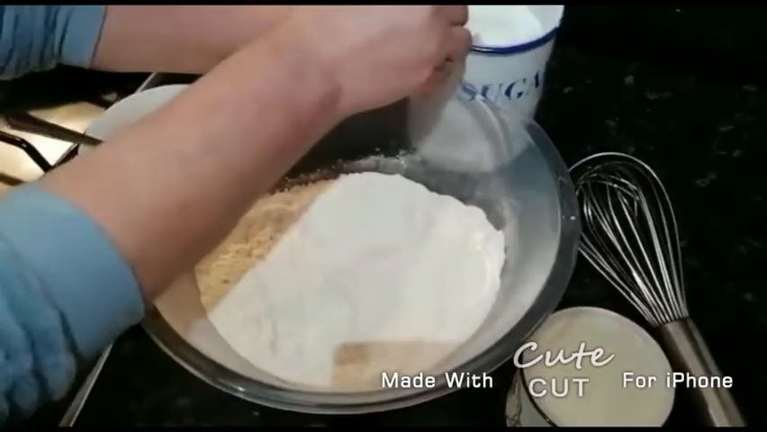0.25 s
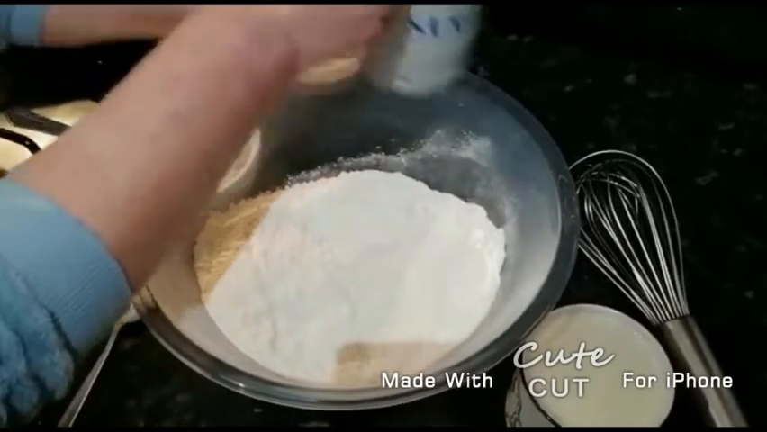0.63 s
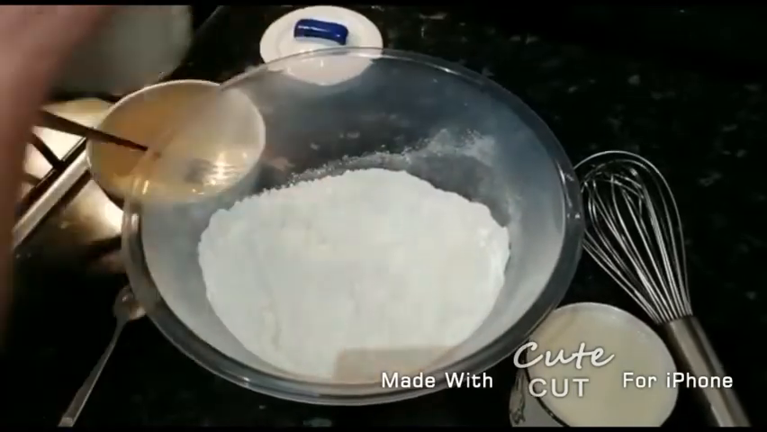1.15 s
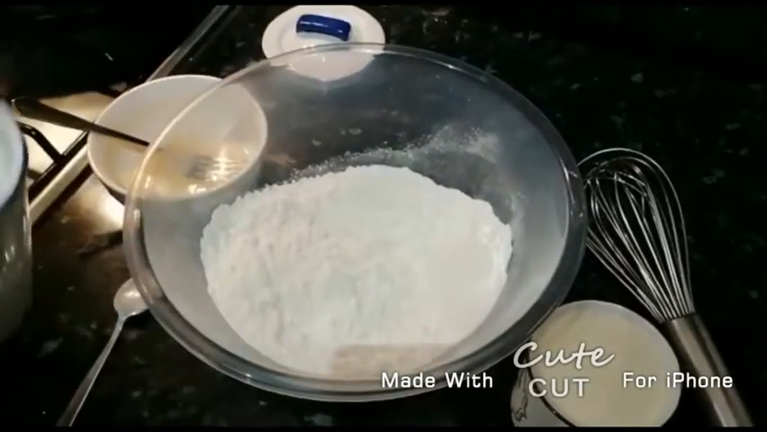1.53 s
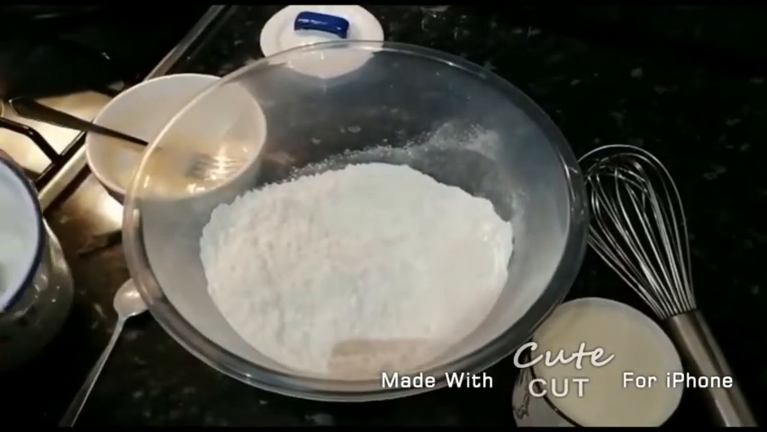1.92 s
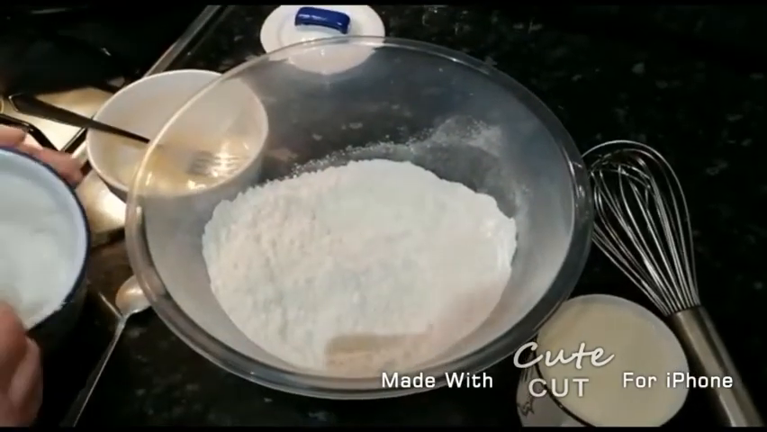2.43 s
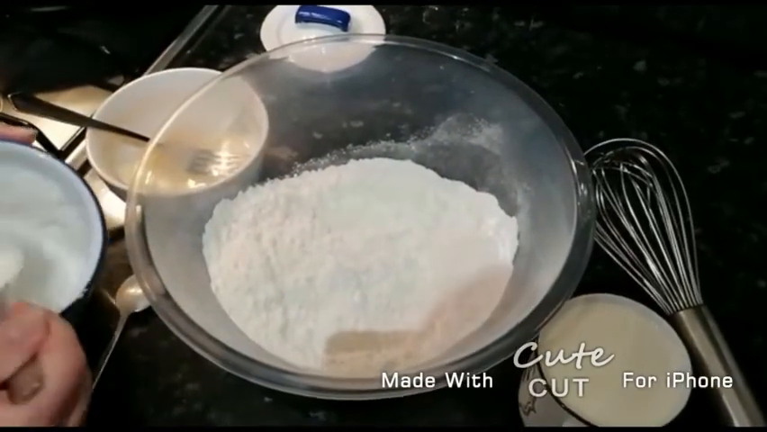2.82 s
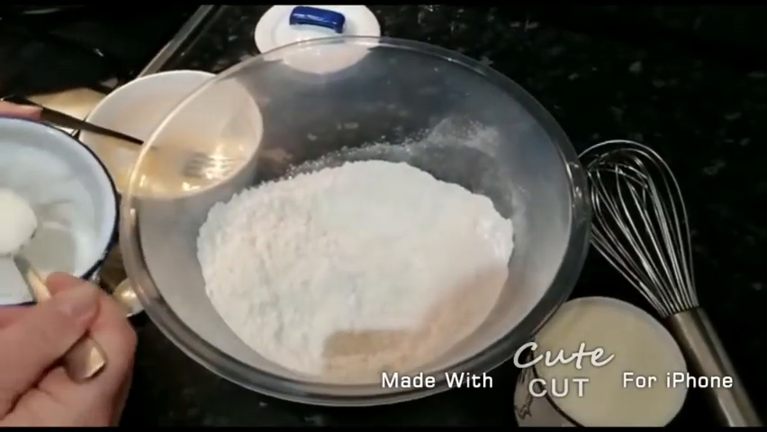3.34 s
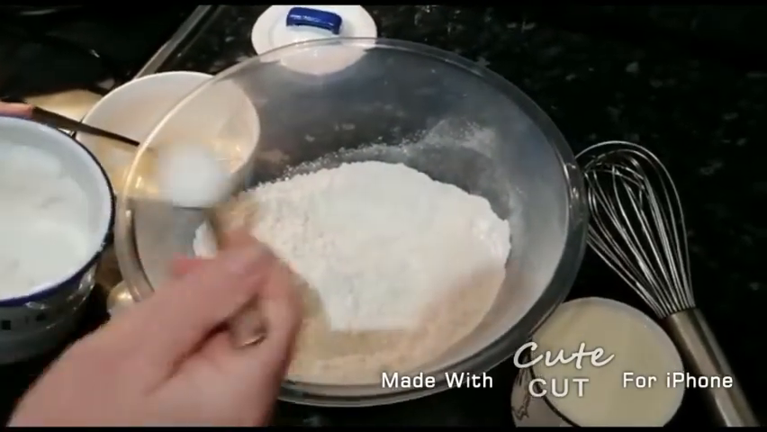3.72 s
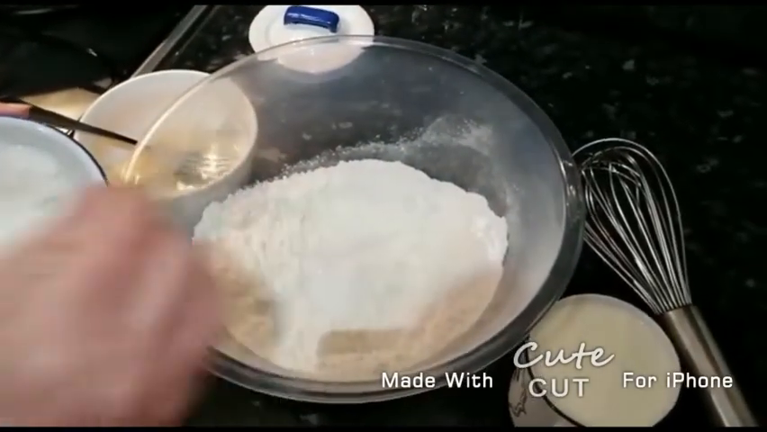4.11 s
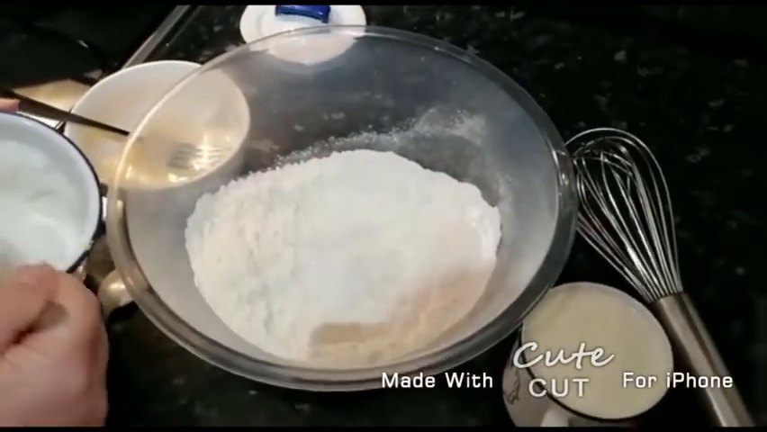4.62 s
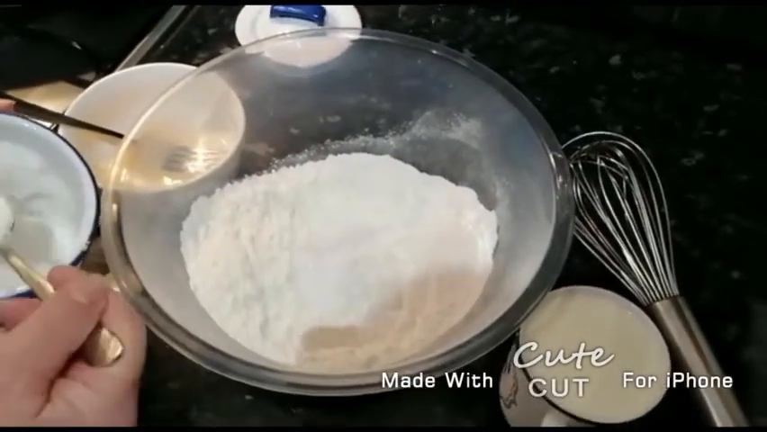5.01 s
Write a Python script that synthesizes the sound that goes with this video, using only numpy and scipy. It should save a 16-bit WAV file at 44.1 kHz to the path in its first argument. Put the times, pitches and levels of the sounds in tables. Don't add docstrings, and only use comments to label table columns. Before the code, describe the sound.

Sparse handling sounds over soft room rumble: a light tap, a brighter spoon-on-jar clink and gritty scrape, near silence, then one dominant hard set-down on the counter with rattling cutlery. A gentler, duller set-down follows a second later. Later the spoon faintly ticks and scrapes in sugar, grains sliding softly. Close phone microphone, lively hard kitchen.

```python
import sys
import numpy as np
from scipy import signal
from scipy.fft import rfft, irfft, next_fast_len
from scipy.io import wavfile
from scipy.ndimage import map_coordinates

SR = 44100
rng = np.random.default_rng(int(sys.argv[2]) if len(sys.argv) > 2 else 0)


def boost(x):
    u = np.asarray(x, float) / 20
    return 10 ** u


def master(y):
    cut = np.clip(np.atleast_2d(y).T, -1, 1)
    pcm = np.round(cut * 32767)
    wavfile.write(sys.argv[1], SR, pcm.astype(np.int16))


N = 231569

# start_s, peak_db, contact_softness_s, cutlery_ring_db, cutlery_delay_s
JAR_LANDINGS = [
    (1.8739, 1, 0.00023, -20.5, .011),
    (2.8673, -8, 0.00035, -36.5, 0.0098),
]
# pitch_hz, level_db, t60_s
SLAB_MODES = [(67.4, -7, 0.54), (169, -3, 0.25), (211.3, 0, 0.26), (274, -25, 0.34), (282.8, 4.5, 0.52),
              (326.5, -1.5, .3), (369.5, -3, 0.083), (457, -6, 0.59), (590, 7, 0.36), (815, -16.5, 0.067),
              (1006, -13.5, 0.78)]
SPOT_DRIVE = [
    [0, 0, 0, 0, 0, 0, 0, 0, 0, 0],
    [1.5, 1.4, -1.5, 1.8, -6, -10, -2, -18, -3, -16],
]
# pitch_hz, level_db (per Hz)
SLAP_SPECTRA = [
    [(35, -66), (60, -9), (298, -0.5), (480, -7), (655, -8.5), (837, -18.5), (1070, -13), (1240, -12),
     (3000, -15.5), (3900, -64.5), (6600, -120)],
    [(60, -33), (170, 0), (280, -3.5), (450, -11.5), (600, -30), (830, -22), (1200, -23), (3000, -64),
     (6000, -80)],
]
CUTLERY_PITCHES = [1768, 2686, 4312, 4378, 4600, 5230, 6202, 7736, 8480, 8866, 10280, 11705, 13170, 14420]
# level_db, t60_s
CUTLERY_RINGS = [
    [(-22.5, 0.47), (-17, 0.107), (-5.5, 0.37), (-4, 0.28), (-7.5, 0.055), (-17, .3), (-18, 0.18),
     (-9.5, 0.23), (-25, 0.097), (-23, 0.12), (-26, 0.47), (-25.5, .22), (-27, 0.29), (-23.5, .1)],
    [(6.5, 0.094), (-6.5, 0.16), (-13, 0.3), (-12, 0.27), (10.5, 0.026), (-21, .3), (-28, 0.19),
     (2.5, 0.12), (-26, 0.18), (-24, .09), (-12, 0.093), (-13, 0.18), (-26, 0.145), (-24, .08)],
]
# level_db, delay_s
DISH_RATTLES = [
    (-31.5, 0),
    (-47.5, 0.0021),
]
# pitch_hz, level_db (per Hz)
DISH_SPECTRUM = [(900, -28.5), (1700, 4.5), (2600, -2.5), (4400, -6.5), (8000, -12.5), (12500, -17.5),
                 (14500, -27.5)]
# start_s, length_s, level_db
TREMBLES = [
    (1.888, 0.17, -53),
    (2.877, 0.13, -61),
]
# pitch_hz, width_hz, level_db
TREMBLE_PEAKS = [
    [(4380, 29, 0.5), (5210, 51, -20.5), (6000, 52, -24), (7730, 37, -15), (8490, 26, -24),
     (10700, 58, -26.5), (11400, 50, -28)],
    [(1760, 74, 1), (2530, 52, 4.5), (4430, 120, 0), (5230, 27, -8), (7750, 33, 0.5), (8170, 36, -14),
     (8400, 83, -22)],
]

# start_s, peak_db, steel_db, knock_db, click_centre_hz
SPOON_CLINKS = [
    (0.0034, -49.5, -22, 3, 2130),
    (0.049, -24.5, -13.5, -3, 2140),
    (0.7534, -10, -10, -33, 2390),
    (1.0229, -40, -52, -7.5, 1860),
    (2.33, -33, -26, -17.5, 3500),
    (2.355, -42, -35, 2.5, 2000),
    (4.1835, -28, -6.5, -4, 1830),
    (4.3901, -36, -19, -6.5, 2070),
    (4.644, -56, -30, 8.5, 1980),
]
# pitch_hz, level_db, t60_s
JAR_MODES = [(2063, -3.5, 0.095), (2250, -19, 0.08), (2700, -19.5, 0.041), (3400, -24, 0.05),
             (4050, 7, 0.052), (4820, 10, 0.036), (5740, -3.5, 0.045), (5770, -10, 0.16), (6223, -9, 0.095),
             (7300, -34, .04)]
# pitch_hz, level_db, t60_s
RIM_MODES = [(1295, 2, 0.068), (1374, 7.5, 0.018)]
# pitch_hz, level_db, t60_s
SPOON_MODES = [(9250, -9, .04), (9300, 5, 0.048), (11400, -3, 0.047), (13270, -42, .04), (14800, -46, .08)]
# pitch_hz, level_db (per Hz)
SUGAR_SPECTRUM = [(2500, -16.5), (4500, 1), (6500, -2.5), (8300, -7), (9500, -6.5), (11500, -9),
                  (13200, -31), (14000, -39.5), (14900, -17), (15500, -4)]

# start_s, level_db, centre_hz, width_hz
DRY_TICKS = [(2.432, -68, 6500, 3000), (3.898, -60, 6270, 9100), (3.977, -74, 9000, 4000),
             (4.005, -64, 8050, 6000), (4.005, -52, 800, 1200), (4.083, -76, 11000, 5000),
             (4.129, -50, 1790, 4480), (4.389, -46, 3900, 1300)]
# start_s, level_db
RIM_SKIPS = [(0.823, -44.5), (.866, -41.5), (.89, -39.5), (0.907, -46), (1.024, -43.5), (4.645, -55.5)]
# start_s, level_db, pitch_hz, t60_s
GRAIN_PINGS = [(.053, -37.5, 282, 0.24), (.066, -47, 2300, 0.077), (0.753, -28, 1464, 0.072),
               (0.759, -48, 6223, 0.34), (.862, -55, 7470, 0.17), (1.023, -55, 4730, 0.064),
               (1.026, -51, 1870, 0.066), (2.328, -40, 3576, 0.067), (2.3285, -42, 3990, 0.06),
               (3.897, -58.5, 5780, 0.032), (3.905, -72.5, 5540, 0.18), (4.13, -57, 690, 0.089),
               (4.146, -58, 9300, 0.25), (4.147, -67, 11400, 0.12), (4.184, -43, 1435, 0.15),
               (4.184, -51, 2000, .05), (4.184, -51, 3960, 0.11), (4.391, -46.5, 2030, 0.097)]

# start_s, length_s, jar_drone_db, sugar_hiss_db
SCRAPE_STROKES = [(0.034, 0.25, -62, -76), (0.691, 0.039, -63.5, -62), (0.762, 0.075, -48, -56.5),
                  (0.85, 0.044, -53, -56), (0.916, 0.15, -66.5, -72), (1.025, 0.1, -61.5, -65.5),
                  (2.022, 0.096, -61.5, -60), (2.14, 0.21, -68, -68), (2.36, 0.06, -68, -89.5),
                  (2.953, 0.14, -70.5, -93), (4.146, 0.055, -62, -63), (4.181, .16, -57, -57.5),
                  (4.526, 0.081, -69.5, -74)]
# middle_s, half_length_s, jar_drone_db, sugar_hiss_db
HAND_SHIFTS = [(0.215, .04, -64, -71.5), (0.626, 0.083, -84, -84), (1.246, 0.14, -70, -86),
               (1.447, 0.11, -70.5, -79), (1.768, 0.26, -73.5, -81), (2.516, 0.083, -72.5, -80),
               (3.404, 0.1, -74, -92), (3.765, 0.053, -73.5, -75.5), (4.02, 0.15, -71.5, -99),
               (4.41, 0.071, -66.5, -86), (4.762, 0.087, -69, -81), (5.099, 0.07, -85, -93)]
# pitch_hz, width_hz, level_db
FRICTION_PEAKS = [(1390, 99, -4.5), (2280, 280, -7.5), (2767, 230, -5.5), (3960, 380, -8), (5100, 220, -17),
                  (6230, 90, -12.5), (7470, 110, -12)]
# start_s, length_s, level_db, centre_hz, width_hz
SUGAR_SLIDES = [(2.347, 0.019, -58, 3720, 1500), (2.48, .03, -76, 9870, 2500),
                (2.545, 0.025, -74, 9300, 600), (2.55, 0.023, -80, 11300, 2000),
                (4.009, 0.03, -61.5, 3860, 1300), (4.042, 0.19, -59, 2910, 700),
                (4.07, 0.069, -60.5, 1570, 250), (4.398, 0.067, -59, 1900, 600),
                (4.408, 0.087, -67, 3060, 700)]

# pitch_hz, level_db (per Hz)
AIR_SPECTRUM = [(12, -24), (20, -1), (42, -23), (70, -0.5), (103, -4.5), (175, -2), (259, -9.5),
                (306, -10.5), (427, -11), (465, -15.5), (597, -15.5), (985, -22), (1670, -26.5),
                (6720, -38.5), (15500, -71)]
# pitch_hz, width_hz, level_db
APPLIANCE_TONES = [
    (188.1, 17, -66),
    (438.8, 5.8, -72.5),
    (1192, 0.96, -79.5),
]
# time_s, level_db
RUMBLE_DRIFT = [(0, -55), (.6, -58), (1.6, -56), (2.7, -56.5), (3.6, -56), (4.0, -53.5), (4.7, -54.5),
                (5.25, -57.5)]
# start_s, level_db
RUMBLE_KNOCKS = [(.15, -57), (1.9, -39), (2.89, -59), (3.03, -53)]
# pitch_hz, t60_s
ROOM_DECAY = [(100, 0.75), (350, 0.38), (1000, 0.44), (2200, 0.54), (6000, .35), (14000, 0.51)]

ATTACK_S, SAG_DB_PER_S, RELEASE_DB_PER_S = 0.0059, 28.5, 253
REST_DRONE_DB, REST_HISS_DB = -79, -87.5
RIM_DB = -7
TICK_CYCLES, TICK_S = 8.1, 0.0097
BOUNCE_HZ, BOUNCE_T60_S = 1340, 0.068
PING_BLUR = 12.3
PUFF_RISE = 0.22
SHOCK_PEAK_S = 0.11
TOP_HZ = 15100


def landings():
    out, t = np.zeros(N), np.arange(int(.8 * SR)) / SR
    rows = zip(JAR_LANDINGS, DISH_RATTLES, CUTLERY_RINGS, SLAP_SPECTRA, SPOT_DRIVE)
    for landing, (rattle_db, rattle_delay), rings, slap, spot in rows:
        s, db, soft, buzz_db, buzz_delay = landing
        force = np.hanning(int(4 * abs(soft) * SR) + 3)
        driven = [(hz, level + more, t60) for (hz, level, t60), more in zip(SLAB_MODES[1:], spot)]
        slab = -ring(driven, t) / 9 + 22 * tail(.8, slap, stretch=0.95)[:len(t)]
        spreading = boost(-10.5) + np.exp(-(t / 0.01) ** 6)
        thud = above(slab * spreading * (1 - np.exp(-t / 0.0025)), hz=124, order=2)
        boom = 0.088 * ring(SLAB_MODES[:1], t) * (1 - np.exp(-t / 0.017))
        add(out, boost(db) * np.convolve(thud + boom, force / force.sum()), s)

        modes = [(hz, level, t60) for hz, (level, t60) in zip(CUTLERY_PITCHES, rings)]
        bouncing = (1 - np.exp(-t / 0.006)) * (.5 + np.exp(-t / 0.015))
        add(out, boost(buzz_db) * bouncing * ring(modes, t, rough=0.91), s + buzz_delay)

        dishes = noise(lambda f: boost(along(DISH_SPECTRUM, f)), count=len(t))
        rattle = boost(rattle_db - 60 * t / 0.32) * (1 - np.exp(-t / 0.0017)) * dishes
        add(out, rattle, s + rattle_delay)
    return out


def chatter():
    out = np.zeros(N)
    for (s, length, db), peaks in zip(TREMBLES, TREMBLE_PEAKS):
        out += boost(db + 2.5 * wobble(70)) * stroke(s, length) * noise(resonances(peaks))
    return out


def clinks():
    out, t = np.zeros(N), np.arange(int(.4 * SR)) / SR
    for s, db, steel_db, knock_db, hz in SPOON_CLINKS:
        near = [(f, level - 7.5 - 9 * abs(np.log2(f / hz)), t60) for f, level, t60 in JAR_MODES]
        click = resonances([(hz, .5 * hz, 0), (4500, 4000, -8)])
        crack = noise(lambda f: click(f) / (1 + (f / 7000) ** 4), count=len(t)) * boost(-60 * t / 0.073)
        grit = noise(lambda f: boost(along(SUGAR_SPECTRUM, f)) * (f > 6000), count=len(t))
        grit = grit * boost(-60 * t / 0.066)

        rung = .5 * ring(near, t, rough=0.71) + boost(RIM_DB) * ring(RIM_MODES, t, rough=1.0)
        rung = rung + 0.23 * boost(steel_db) * ring(SPOON_MODES, t, rough=1.0)
        contact = (rung + 0.38 * crack + .5 * boost(steel_db) * grit) * (1 - np.exp(-t / 0.0014))
        bright = above(contact, hz=1250, order=6)

        knock = 0.25 * ring(SLAB_MODES[2:8], t) * boost(-60 * t / 0.69)
        knock = knock + 0.13 * noise(resonances([(617, 175, 0)]), count=len(t)) * boost(-60 * t / 0.46)
        hit = boost(db - 3.5) * (bright + boost(knock_db) * knock)
        add(out, hit, s)
        add(out, boost(-11.0) * signal.fftconvolve(hit, tail(.4)), s + 0.0043)
    return out


def ticks():
    out, t = np.zeros(N), np.arange(int(.25 * SR)) / SR
    skips = [(s, db, BOUNCE_HZ, BOUNCE_T60_S) for s, db in RIM_SKIPS]
    puffs = [(s, db, hz, width, TICK_S + TICK_CYCLES / hz) for s, db, hz, width in DRY_TICKS]
    puffs += [(s, db, hz, PING_BLUR / t60, t60) for s, db, hz, t60 in GRAIN_PINGS + skips]
    for s, db, hz, width, t60 in puffs:
        band = noise(lambda f: resonances([(hz, width, 0)])(f) ** 2, count=len(t))
        add(out, boost(db - 60 * t / t60) * (1 - np.exp(-t * width / PUFF_RISE)) * band, s)
    return out


def scraping():
    moves = [stroke(s, length) for s, length, _, _ in SCRAPE_STROKES]
    moves += [np.exp(-((np.arange(N) / SR - s) / half) ** 2) for s, half, _, _ in HAND_SHIFTS]
    rows = SCRAPE_STROKES + HAND_SHIFTS
    rub = together(REST_DRONE_DB, [boost(row[2]) * move for row, move in zip(rows, moves)])
    grind = together(REST_HISS_DB, [boost(row[3]) * move for row, move in zip(rows, moves)])

    def drone_colour(f):
        slope = boost(-12 - 6.5 * np.log2(f / 2000 + 0.061))
        return (np.abs(resonances(FRICTION_PEAKS)(f)) + slope) / (1 + (1150 / (f + 1)) ** 12)

    def hiss_colour(f):
        rung = np.abs(resonances([(9300, 150, 0), (11400, 200, -2), (7470, 120, -3)])(f))
        return boost(along(SUGAR_SPECTRUM, f)) * (1 + 2.9 * rung)

    drone = noise(drone_colour)
    hiss = noise(hiss_colour)
    drone_grains = boost(0.68 * wobble(60) + 1.16 * wobble(400))
    hiss_grains = boost(1.2 * wobble(66) + 1.0 * wobble(380))
    return rub * drone_grains * drone + grind * hiss_grains * hiss


def swish():
    grains = boost(1.8 * wobble(90) + 2.0 * wobble(500))
    slides = np.zeros(N)
    for s, length, db, hz, width in SUGAR_SLIDES:
        band = noise(lambda f: resonances([(hz, width, 0)])(f) ** 2)
        slides += boost(db - 2.5) * stroke(s, length) * band
    return grains * slides


def room_tone():
    now, hz = np.arange(N) / SR, np.fft.rfftfreq(N, 1 / SR)
    swells = []
    for s, db in RUMBLE_KNOCKS:
        since = np.maximum(now - s, 0) / SHOCK_PEAK_S
        swells.append(boost(db) * since * np.exp((1 - since * since) / 2))
    level = together(np.interp(now, *np.transpose(RUMBLE_DRIFT)), swells)

    deep = 1 / (1 + (hz / 130) ** 4)
    lows = np.zeros(N)
    for share in (deep, 1 - deep):
        lumps = boost(2.4 * wobble(5.89))
        rumble = noise(lambda f: boost(along(AIR_SPECTRUM, f)) / (1 + (f / 500) ** 4))
        lows += lumps * irfft(rfft(rumble) * np.sqrt(share), N)
    lows = level * unit(lows)
    rest = noise(lambda f: boost(along(AIR_SPECTRUM, f)) / (1 + (500 / (f + 1)) ** 4))
    hum = sum(boost(db) * noise(resonances([(tone, width, 0)])) for tone, width, db in APPLIANCE_TONES)
    return lows + boost(-69.5 + 0.77 * wobble(7.0)) * rest + hum


def ring(modes, t, rough=0):
    knots = np.arange(0, t[-1] + .02, .008)
    out = np.zeros(len(t))
    for hz, db, t60 in modes:
        flutter = 1 + rough * np.interp(t, knots, rng.standard_normal(len(knots)))
        out += boost(db - 60 * t / t60) * flutter * np.sin(2 * np.pi * hz * t)
    return out


def resonances(peaks):
    def response(f):
        total = 0
        for k, (centre, width, db) in enumerate(peaks):
            damping = 1j * f * width
            total = total + (-1) ** k * boost(db) * damping / (centre * centre - f * f + damping + 1e-9)
        return total
    return response


def stroke(s, length):
    t = np.arange(N) / SR - s
    fall_db = SAG_DB_PER_S * np.maximum(t, 0) + RELEASE_DB_PER_S * np.maximum(t - length, 0)
    return np.clip(t / ATTACK_S, 0, 1) * boost(-fall_db)


def together(rest_db, parts):
    return np.sqrt(boost(2 * rest_db) + sum(part ** 2 for part in parts))


def tail(seconds, spectrum=((20, 0), (20000, 0)), stretch=1):
    source = noise(lambda f: boost(along(spectrum, f)), count=int(seconds * SR))
    hz, t, z = signal.stft(source, SR, nperseg=256)
    t60 = stretch * along(ROOM_DECAY, hz)[:, None]
    x = signal.istft(z * boost(-60 * t / t60), SR, nperseg=256)[1]
    return x / np.linalg.norm(x)


def above(x, hz, order):
    return signal.sosfilt(signal.butter(order, hz, "high", fs=SR, output="sos"), x)


def noise(response, count=N):
    m = next_fast_len(count)
    spectrum = rfft(rng.standard_normal(m)) * response(np.fft.rfftfreq(m, 1 / SR))
    return unit(irfft(spectrum, m)[:count])


def wobble(rate):
    knots = rng.standard_normal(int(N * rate / SR) + 4)
    return map_coordinates(knots, [np.arange(N) * rate / SR])


def unit(x):
    return x / np.sqrt(np.mean(x ** 2) + 1e-20)


def along(points, hz):
    f, v = np.transpose(points)
    return np.interp(np.log(hz + 1), np.log(f + 1), v)


def add(track, x, s):
    part = track[max(round(s * SR), 0):][:len(x)]
    part += x[:len(part)]


def scene():
    return (landings() + clinks() + ticks() + scraping() + swish() + room_tone() + chatter())[None]


def top_cut(x):
    return signal.sosfilt(signal.butter(12, 16080, fs=SR, output="sos"), x)


def record(dry):
    rounded = dry / (1 + np.abs(dry / .74) ** 5) ** (1 / 5)
    hz = np.fft.rfftfreq(N, 1 / SR)
    finished = irfft(rfft(rounded) / (1 + (hz / TOP_HZ) ** 80), N)
    return top_cut(finished)


dry = scene()
out = record(dry)
master(out)
```